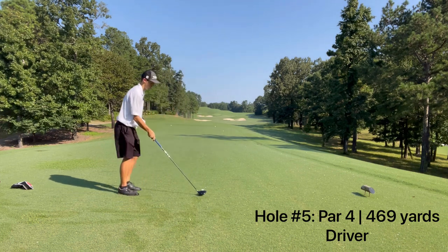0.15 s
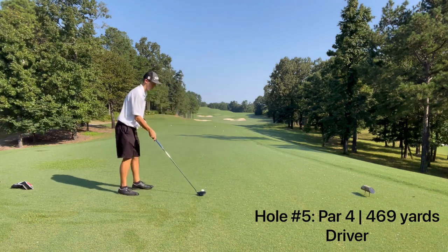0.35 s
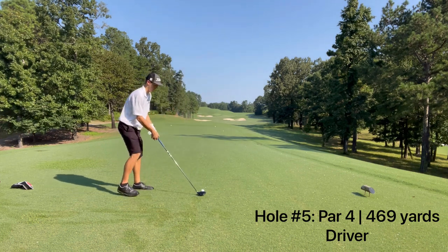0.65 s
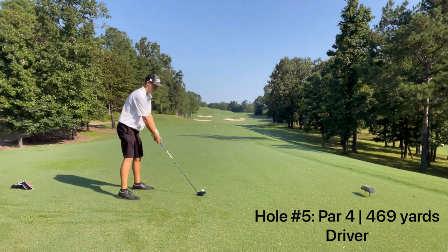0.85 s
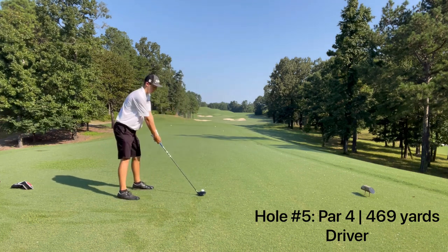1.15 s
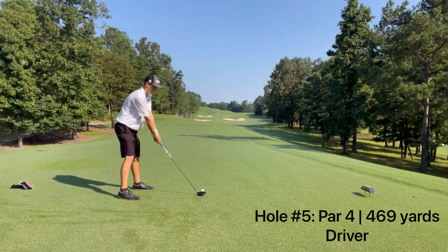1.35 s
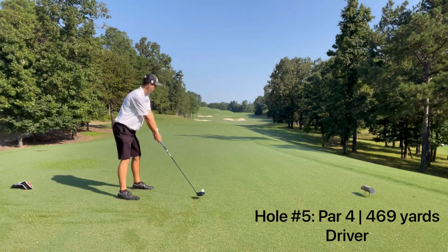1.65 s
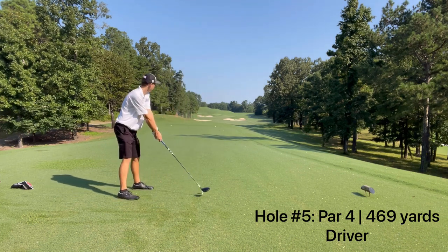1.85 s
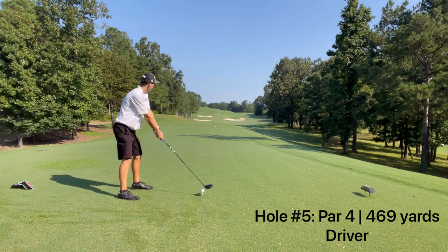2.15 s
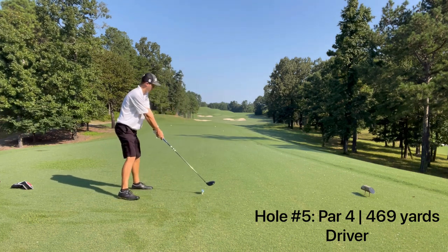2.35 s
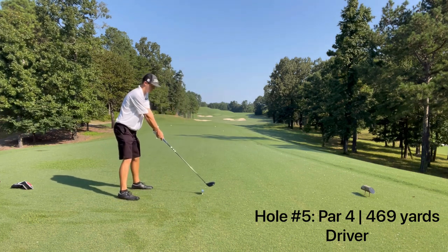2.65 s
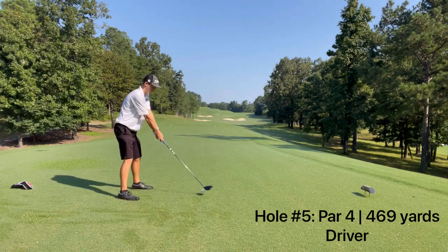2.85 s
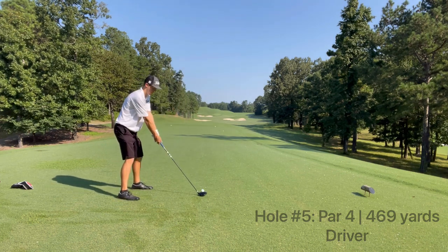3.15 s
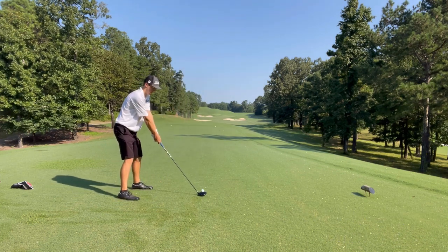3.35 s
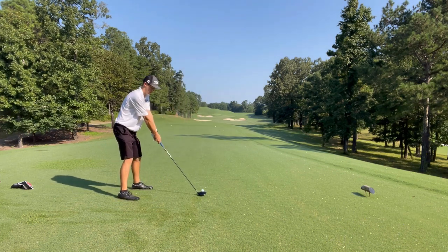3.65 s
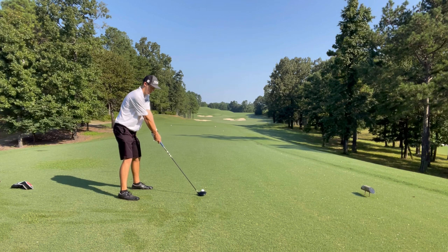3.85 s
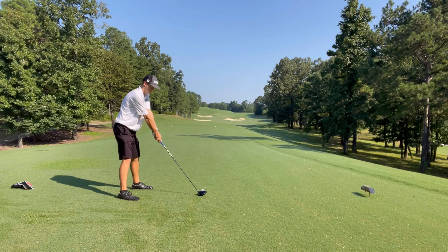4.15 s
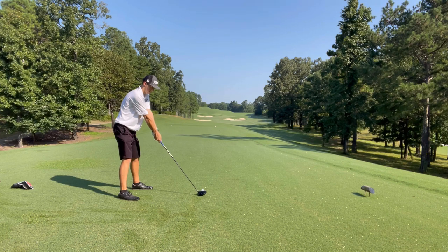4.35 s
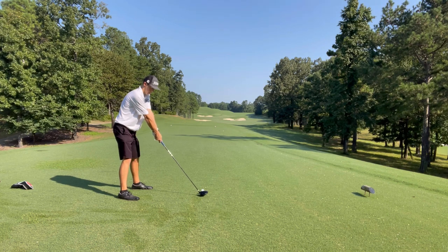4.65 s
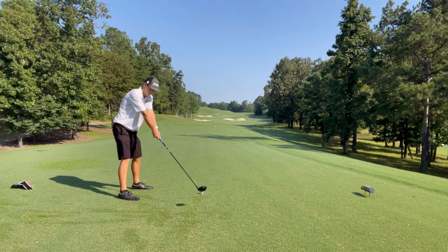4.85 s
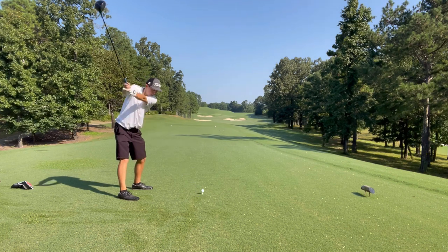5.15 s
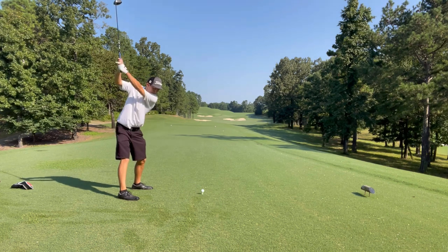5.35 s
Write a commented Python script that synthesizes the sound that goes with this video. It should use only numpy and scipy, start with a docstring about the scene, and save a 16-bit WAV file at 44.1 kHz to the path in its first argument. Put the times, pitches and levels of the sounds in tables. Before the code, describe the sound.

Distant mowers drone and rumble low across an open golf course while crickets pulse and a small bird chips now and then.

```python
"""Distant mowers drone, whirr and boom past a golf tee on a summer morning; no blow falls.
Engines are wavering sine waves; blurred drones, whirr, rumble and a soft wash of air are shaped noise.
Crickets pulse in the tree line as rough tones and bursts of narrow noise. A small bird gives rising
chips, made of sweeping tones, and a katydid buzzes faintly in high throbbing noise.
The club head brushes the grass once, as a short grainy burst of noise."""
import sys
import numpy as np
from scipy import signal
from scipy.fft import rfft, irfft, next_fast_len
from scipy.io import wavfile

SR = 44100
rng = np.random.default_rng(int(sys.argv[2]) if len(sys.argv) > 2 else 0)


def put_to_file(sound):
    """Save the sound as 16-bit audio at rate SR, in the file named by the first command-line argument."""
    columns = np.atleast_2d(sound).T  # one column per channel
    safe = np.clip(columns, -1, 1)
    whole_steps = np.round(safe * 32767)
    wavfile.write(sys.argv[1], SR, whole_steps.astype(np.int16))


N = 242991
T, HZ = np.arange(N) / SR, np.fft.rfftfreq(N, 1 / SR)  # time in seconds, frequency in Hz

# How much louder far sounds are at the left microphone port than at the right.
# Each row: frequency in Hz, left minus right in dB.
PORT_BALANCE = [(60, 1.6), (200, 3), (380, 0.72), (700, 3.5), (920, 5.9), (1290, 3.9), (1650, 3.5),
                (2050, 9.8), (2500, 7), (3600, 3.8), (4600, 6.9), (7000, 3.9), (8100, 1.5), (10000, 0.5)]
# How far the left port runs ahead of the right. Each row: frequency in Hz, lead in radians.
LEFT_LEAD = [(40, 0.13), (150, 0.56), (270, 1.05), (400, 2.07), (720, 2.41), (900, 2.6), (1400, 3.1),
             (2000, 3.7), (2800, 7.02), (4200, 9.7), (5500, 10), (6300, 12.5), (7300, 11.4), (10000, 15.1),
             (11200, 16)]


def gain_of(db):
    """Turns decibels into a factor on the sound wave."""
    return 10 ** (np.asarray(db) / 20)


def evened(x):
    """Scales a signal to an rms (average strength) of 1."""
    return x / np.sqrt(np.mean(abs(x) ** 2) + 1e-30)


def over_frequency(points):
    """Joins table points over a log frequency axis, since we hear pitch in ratios."""
    f, value = np.transpose(points)
    return np.interp(np.log(HZ + 1), np.log(f + 1), value)


def over_time(points, times=T):
    """Joins table points by straight lines over time."""
    return np.interp(times, *np.transpose(points))


def white():
    """Spectrum of white noise: equal power at every frequency on average."""
    return rng.standard_normal(len(HZ)) + 1j * rng.standard_normal(len(HZ))


def drift(rate):
    """Slow random wandering of rms 1, up to about rate changes a second."""
    slow = np.exp(-(HZ / rate) ** 2) * (HZ > 0)
    return evened(irfft(white() * slow, N))


def ring(hz, width):
    """Gain of a resonance, 1 at its centre and falling off on both sides."""
    return 1 / (1 + ((HZ - hz) / (.8 * width)) ** 2)


def ring_noise(hz, width):
    """White noise passed through a resonance: a blurred tone."""
    return irfft(white() * ring(hz, width), N)


def sides(balance_db):
    """Left and right gains that set a sound off to one side; positive leans left."""
    return gain_of([[balance_db / 2], [-balance_db / 2]])


def ports(spectrum, likeness, balance_db):
    """Noise of rms 1 over both ports, partly alike and out of step, as from a spread-out source."""
    same, left = np.clip(likeness, 0, 1), white()
    right = same * left + np.sqrt(1 - same ** 2) * white()
    right = right * np.exp(-1j * over_frequency(LEFT_LEAD))
    both = np.array([left * gain_of(balance_db / 2), right * gain_of(-balance_db / 2)])
    return evened(irfft(spectrum * both, N))


def from_afar(x):
    """Brings one far source to both ports, which differ in level and timing at each frequency."""
    half = gain_of(over_frequency(PORT_BALANCE) / 2) * np.exp(.5j * over_frequency(LEFT_LEAD))
    return irfft(rfft(x) * np.array([half, 1 / half]), N)


def bed(table):
    """Wide noise from all over the course, arriving partly alike at the two ports."""
    # Each row: frequency in Hz, likeness of left and right from 0 to 1.
    port_likeness = [(60, 0.97), (150, 0.88), (210, 0.8), (270, 0.69), (390, 0.91), (700, 0.82),
                     (880, 0.53), (1350, 0.9), (1950, 0.48), (2500, 1), (3400, 0.61), (5000, 0.46),
                     (6500, 0.76), (10000, 1)]
    return ports(gain_of(over_frequency(table)), over_frequency(port_likeness), over_frequency(PORT_BALANCE))


def swell(centre, length):
    """One smooth rise and fall: a single hump of a squared cosine."""
    return np.cos(np.pi * np.clip((T - centre) / length, -.5, .5)) ** 2


def mottled(x, patch_db, patch_hz, patch_s):
    """Moving air lifts and drops small patches of a far sound in time and frequency."""
    hz, t, z = signal.stft(x, SR, nperseg=1024, noverlap=768)
    across, along = np.fft.fftfreq(len(hz), hz[1])[:, None], np.fft.fftfreq(len(t), t[1])
    blur = np.exp(-(across * patch_hz) ** 2 - (along * patch_s) ** 2)
    grain = np.fft.fft2(rng.standard_normal(z.shape[1:]))  # one pattern for both ports
    patches = evened(np.fft.ifft2(grain * blur).real)
    return signal.istft(z * gain_of(patch_db * patches), SR, nperseg=1024, noverlap=768)[1][:, :N]


def beats(first, period):
    """Times of an insect's evenly spaced calls."""
    return np.arange(first, T[-1] + period, period)


def mower_engine(engine_hz=72.38, waver_hz=0.14, fade_db=0.8):
    """A governed engine hums at multiples of one pitch (orders), each fading in the moving air."""
    # Level of the first order. Each row: time in seconds, level in dB rms before the fading.
    first_order_level = [(0, -34), (1.4, -39.5), (1.65, -40.5), (2.05, -33.5), (2.8, -37), (3.1, -39.5),
                         (3.6, -37.5), (3.95, -51), (4.35, -44), (4.8, -36.5), (5.5, -51.5)]
    # Level of the second order, the main hum. Each row: time in seconds, level in dB rms before the fading.
    second_order_level = [(0, -37.5), (1.9, -34), (2.5, -35.5), (2.95, -40), (3.25, -35), (3.85, -38.5),
                          (4.33, -45.5), (4.6, -38), (5.05, -37.5), (5.25, -31), (5.5, -39)]
    # Higher orders. Each row: multiple of the engine pitch, level in dB relative to the second order.
    upper_orders = [(3, -20), (5, -28), (6, -28.5)]
    turns = np.cumsum(engine_hz + waver_hz * drift(1.77)) / SR
    hum_db = over_time(second_order_level)
    orders = [(1, over_time(first_order_level)), (2, hum_db)]
    orders += [(round(k), hum_db + db) for k, db in upper_orders]
    hum = 0
    for k, db in orders:
        level = gain_of(db + fade_db * drift(4.6))
        hum = hum + level * np.sin(2 * np.pi * (k * turns + rng.random()))
    return from_afar(np.sqrt(2) * hum)  # a sine needs the root of 2 to have an rms of 1


def other_hums(waver_hz=.15):
    """Other machines hum steadily, as sine waves whose pitch wavers a little."""
    # Each row: pitch in Hz, level in dB rms.
    hum_tones = [(62.1, -41.5), (66.1, -54.5), (90.2, -44.5), (101.5, -45.5), (120.1, -42.5), (186.2, -54)]
    hums = 0
    for hz, db in hum_tones:
        turns = np.cumsum(hz + waver_hz * drift(0.99)) / SR
        hums = hums + gain_of(db) * np.sin(2 * np.pi * (turns + rng.random()))
    return from_afar(np.sqrt(2) * hums)


def far_drones(fade_db=1.5, fades_per_s=6.3):
    """Machines further off drone as blurred tones: noise through resonances, gently fading."""
    # Each row: centre in Hz, width in Hz, starting level in dB rms before the fading, change in dB a second.
    drone_bands = [(196.9, 15.5, -43, 0), (289.5, 17, -55.5, -0.3), (379.3, 22, -57, 0.78),
                   (588, 19, -60, 1.22), (695, 170, -64, 0.95)]
    drones = 0
    for hz, width, db, change in drone_bands:
        level = gain_of(db + change * T + fade_db * drift(fades_per_s))
        drones = drones + level * evened(ring_noise(hz, width))
    return from_afar(drones)


def rumble(start_db=-30, fall_db_per_s=0.4, lump_db=0.4):
    """Exhaust noise blurred by distance, sinking as the mowers draw slowly away, with brief lulls."""
    # Colour of the rumble. Each row: frequency in Hz, relative level in dB per Hz.
    rumble_colour = [(20, -49), (30, -35), (40, -19), (52, -14.5), (70, -11), (88, -0.5), (108, -4),
                     (135, -6.5), (165, -11.5), (212, -13), (250, -23.5), (400, -27.5), (900, -81.5),
                     (9000, -120)]
    # Each row: middle in seconds, length in seconds, change in dB at the middle.
    lulls = [(0.863, 0.067, -7), (0.958, 0.072, -8), (1.76, 0.075, -6.5), (2.892, 0.11, -5),
             (3.136, 0.12, -5), (4.13, 0.072, -4), (4.37, 0.22, -6.5), (5.45, 0.13, -6.5)]
    level_db = start_db - fall_db_per_s * T + lump_db * drift(4.6)
    for s, length, db in lulls:
        level_db = level_db + db * swell(s, length)
    return bed(rumble_colour) * gain_of(level_db)


def whirr(wander_hz=14, fade_db=2.5):
    """Hollow whirr of far blades: blurred tones that wander and fade, each in its own way."""
    # Each row: centre in Hz before wandering, width in Hz, relative level in dB before fading.
    blade_tones = [(815, 32, -2.5), (887, 37, 0), (957, 50, -2), (1040, 21, -4)]
    # Each row: time in seconds, level in dB rms.
    whirr_level = [(0, -56), (1.17, -56.5), (1.25, -74), (1.33, -54), (1.72, -65.5), (1.87, -54),
                   (2.5, -53.5), (2.62, -59), (2.75, -53.5), (3.7, -55.5), (4.07, -64), (4.72, -55.5),
                   (5.5, -56)]
    tones = 0
    for hz, width, db in blade_tones:
        # the complex (analytic) form lets a turning phase shift the pitch
        blurred = signal.hilbert(ring_noise(hz, width), next_fast_len(N))[:N]
        wander = np.exp(2j * np.pi * np.cumsum(wander_hz * drift(3.015)) / SR)
        tones = tones + gain_of(db + fade_db * drift(8)) * evened((blurred * wander).real)
    return from_afar(evened(tones) * gain_of(over_time(whirr_level)))


def wash(start_db=-43.5, rise_db_per_s=0.1838):
    """Far blades and air blend into a soft noise that comes and goes in patches."""
    # Each row: frequency in Hz, relative level in dB per Hz.
    wash_colour = [(100, -15), (240, -13.5), (290, 0.5), (335, -6), (385, 0.5), (480, -1), (600, -4.5),
                   (780, -8), (920, -6.5), (1030, -9.5), (1200, -13), (1480, -16), (1780, -22.5),
                   (3000, -36.5), (8000, -58.5), (13000, -79)]
    patchy = mottled(bed(wash_colour), patch_db=2.15, patch_hz=220, patch_s=0.037)
    return gain_of(start_db + rise_db_per_s * T) * patchy


def chorus(level_db=-55.5):
    """Leaves and countless insects blend into a noise smoother than the wash."""
    # Each row: frequency in Hz, relative level in dB per Hz.
    chorus_colour = [(1000, -16.5), (1750, -7), (2050, 1), (2500, -2), (2920, -4), (3450, -0.8),
                     (4250, -5.5), (4850, -5.5), (5700, -9), (7500, -13.5), (7950, -19), (9200, -25),
                     (10600, -23.5), (11600, -40.5), (15000, -53)]
    return gain_of(level_db) * mottled(bed(chorus_colour), patch_db=1.57, patch_hz=348, patch_s=0.026)


def hiss(level_db=-94.5, hz=13000, width_hz=2600):
    """A thin steady hiss at the top: noise in a broad resonance, the same at both ports."""
    return gain_of(level_db) * evened(ring_noise(hz, width_hz))


def trills(first, period, length, db, hz, width_hz, balance_db, uneven_db):
    """A far cricket's bursts on a steady beat, each a little louder or softer."""
    bursts = 0
    for s in beats(first, period):
        bursts = bursts + gain_of(db + uneven_db * rng.standard_normal()) * swell(s, length)
    return bursts * ports(ring(hz, width_hz), .13, balance_db)


def ground_crickets(strokes_per_s=42):
    """One trills in slow bursts of wing strokes, a lower one pulses quickly, a high faint one never stops."""
    stroke_turns = np.cumsum(strokes_per_s + 3 * drift(5)) / SR
    strokes = evened(1 + .7 * np.sin(2 * np.pi * stroke_turns))
    slow = strokes * trills(first=.018, period=.2232, length=0.24, db=-70.5, hz=6690, width_hz=110,
                            balance_db=3.0, uneven_db=-0.5)
    quick = trills(first=.071, period=.10204, length=0.11, db=-73.0, hz=4680, width_hz=150,
                   balance_db=5.0, uneven_db=1.5)
    steady = gain_of(-80) * ports(ring(7600, 90), .5, balance_db=-1.5)
    return slow + quick + steady


def mole_cricket(first=.047, period=.12477, length=.036, low_hz=2080, top_hz=2378, waver_hz=50, rasp_db=2,
                 uneven_db=.7, echo_hz=2390, echo_width_hz=450, echo_decay_s=0.06, echo_db=0.5, balance_db=3):
    """Eight rough chirps a second, each arching in pitch; trees return echoes and a blurred tail."""
    # The chirps come and go in groups. Each row: time in seconds, level of a chirp in dB before rasp and echoes.
    chirp_level = [(0, -63), (.7, -58), (1.0, -61), (1.17, -59), (1.3, -61.5), (1.8, -57.5), (2.3, -60.5),
                   (2.42, -57.3), (2.8, -60), (3.04, -63), (3.17, -58), (3.42, -60.5), (3.55, -57.5),
                   (3.79, -60), (4.1, -57), (4.29, -60), (4.66, -59), (4.9, -55.7), (5.5, -55)]
    # Echoes from the tree line. Each row: delay in seconds, level in dB, left minus right in dB.
    tree_echoes = [(.014, -6, 4), (.032, -9, -3), (.062, -11, 2)]
    chirps = 0
    for s in beats(first, period):
        uneven_length = length * gain_of(uneven_db * rng.standard_normal())
        chirps = chirps + gain_of(over_time(chirp_level, s)) * swell(s, uneven_length)
    from_crest = (T - first + period / 2) % period - period / 2  # seconds from the nearest chirp's middle
    arch = np.exp(-(2 * from_crest / length) ** 2)
    hz = low_hz + (top_hz - low_hz) * arch + waver_hz * drift(250)
    tone = np.sin(2 * np.pi * np.cumsum(hz) / SR)
    call = chirps * evened(tone * gain_of(rasp_db * drift(250)))
    heard = call * sides(balance_db)
    for delay, db, side_db in tree_echoes:
        heard = heard + np.interp(T - delay, T, call, left=0) * gain_of(db) * sides(side_db)
    keep = np.exp(-1 / (echo_decay_s * SR))  # share of the tail left after each sample
    tail = signal.lfilter([2 / (length * SR)], [1, -keep], chirps)
    return heard + gain_of(echo_db) * tail * ports(ring(echo_hz, echo_width_hz), 0.27, balance_db)


def bird(start_hz=4200, top_hz=7680, sweep_s=.004, chip_s=0.019, balance_db=8, fade_db=7, flutter_db=2,
         waver_hz=150, blur_s=.004, blur_db=-1.5):
    """Each chip is a fluttering tone that sweeps up, levels off and fades, blurred by leaves nearby."""
    # Each row: start in seconds, level in dB before the fade, flutter and blur.
    chips = [(.134, -57.5), (.803, -62.5), (1.588, -61), (2.327, -57.5), (3.065, -60), (3.986, -61.5),
             (4.793, -59), (5.199, -62.5), (5.457, -56.5)]
    song = np.zeros(N)
    for s, db in chips:
        age = np.maximum(T - s, 0)
        hz = top_hz + (start_hz - top_hz) * np.exp(-age / sweep_s) + waver_hz * drift(500)
        shape = np.minimum(10 * swell(s + chip_s / 2, chip_s), 1)  # quick start and stop
        level = gain_of(db - fade_db * age / chip_s) * shape
        song += level * np.sin(2 * np.pi * np.cumsum(hz) / SR)
    song = song * gain_of(flutter_db * drift(300))
    leaves = rng.standard_normal((2, 1024)) * np.exp(-T[:1024] / blur_s)  # many tiny echoes dying away
    blur = signal.oaconvolve(song[None], leaves / np.linalg.norm(leaves[0]), axes=1)[:, :N]
    return (song + gain_of(blur_db) * blur) * sides(balance_db)


def katydid(hz=14400, width_hz=2100, rasp_db=1.5, attack_s=.025, release_s=.03, strokes_per_s=47.5, stroke_db=2.3):
    """Faint ticks and a rasping high buzz: noise that swells, throbs with the wing strokes and dies away."""
    # Short ticks lead up to a long buzz.
    # Each row: start in seconds, length in seconds, level in dB before rise and throb, rise over its length in dB.
    buzzes = [(.225, .035, -91, 0), (.815, .04, -93, 0), (1.56, .045, -91, 0), (1.93, .1, -92, 3),
              (2.055, .035, -86, 0), (2.21, .11, -80, -5), (2.33, .28, -87, 2), (2.6, .45, -81.5, 1)]
    level = np.zeros(N)
    for s, length, db, rise_db in buzzes:
        attack = np.clip((T - s) / attack_s, 0, 1)
        release = np.exp(-np.maximum(T - s - length, 0) / release_s)
        rising = gain_of(db + rise_db * np.clip((T - s) / length, 0, 1))
        level = np.maximum(level, attack * release * rising)
    throb_db = stroke_db * np.sin(2 * np.pi * strokes_per_s * T)
    rasp = gain_of(rasp_db * drift(300) + throb_db)
    return level * evened(ring_noise(hz, width_hz) * rasp)


def booms():
    """Now and then the far rumble gathers on one note and lets go again: swelling sine waves."""
    # Each row: middle in seconds, length in seconds, pitch in Hz, level in dB rms at the middle.
    boom_notes = [(0.723, 0.35, 104, -32), (1.01, 0.25, 91.5, -31.5), (1.305, 0.33, 89, -32),
                  (2.1, 0.45, 102.3, -32), (2.371, 0.22, 193.4, -35), (2.607, 0.42, 101.4, -30.5),
                  (3.32, 0.3, 98, -34), (3.88, 0.17, 103.2, -32.5), (4.072, 0.25, 90.6, -31.5),
                  (4.523, 0.11, 122, -32.5), (5.092, 0.34, 104.7, -35.5)]
    notes = 0
    for s, length, hz, db in boom_notes:
        notes = notes + gain_of(db) * swell(s, length) * np.sin(2 * np.pi * (hz * T + rng.random()))
    return from_afar(np.sqrt(2) * notes)


def grass(s=3.04, length=.065, db=-69.0, hz=9000, width_hz=3800, grain_db=2):
    """Blades of grass flick against the sole of the club as it is set down: a grainy burst of noise."""
    level = gain_of(db + grain_db * drift(296)) * swell(s, length)
    return level * ports(ring(hz, width_hz), 0.92, balance_db=1)


def scene():
    """Adds up everything heard from the tee."""
    machines = mower_engine() + other_hums() + far_drones() + rumble() + whirr() + booms()
    air = wash() + chorus() + hiss()
    animals = ground_crickets() + mole_cricket() + bird() + katydid()
    return machines + air + animals + grass()


def record(dry, edge_hz=15700):
    """The recorder's band limit takes away the highest treble; both ends fade softly."""
    ends = np.clip(np.minimum(T, T[-1] - T) / .004, 0, 1)  # fades of 4 ms
    faded = dry * np.sin(np.pi / 2 * ends) ** 2
    low_pass = signal.firwin(511, edge_hz, window=("kaiser", 9), fs=SR)
    return signal.oaconvolve(faded, low_pass[None], "same")


dry = scene()
out = record(dry)
put_to_file(out)
```